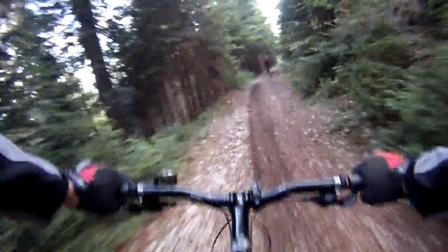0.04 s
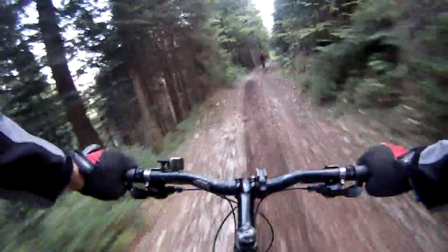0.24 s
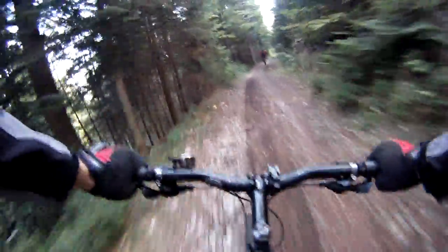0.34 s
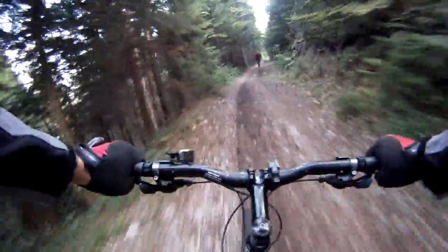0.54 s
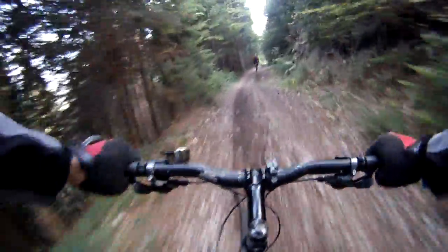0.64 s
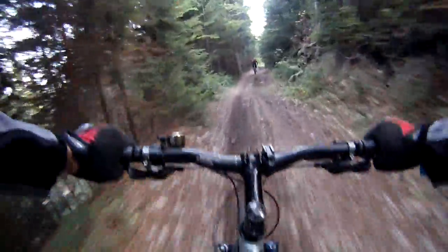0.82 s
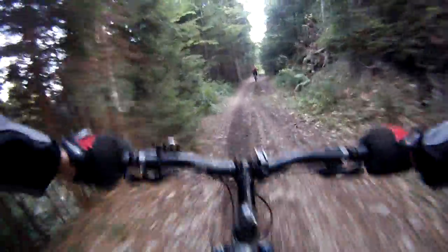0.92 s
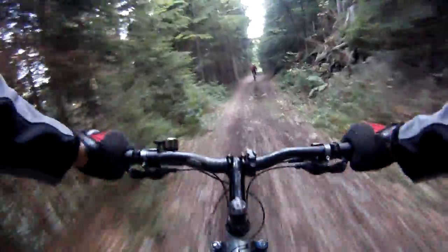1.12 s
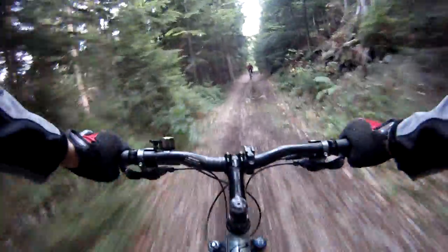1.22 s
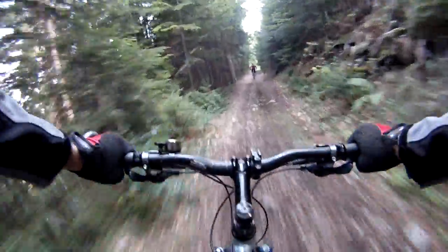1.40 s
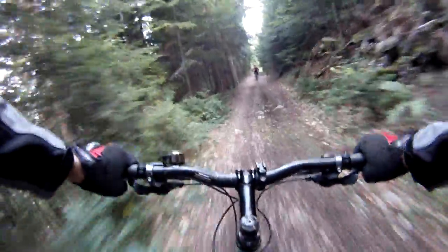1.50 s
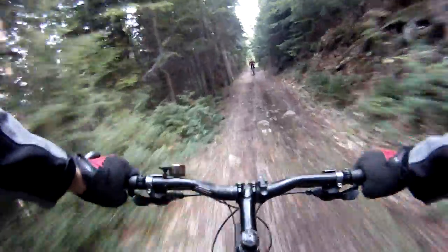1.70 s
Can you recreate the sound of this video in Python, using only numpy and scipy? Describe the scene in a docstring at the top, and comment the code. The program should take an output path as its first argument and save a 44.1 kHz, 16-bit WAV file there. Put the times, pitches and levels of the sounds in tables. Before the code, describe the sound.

A mountain bike rattles over a dirt trail, heard close from the rider. The sharpest clack comes at 0.2 seconds, with more at 1.1 and 1.5. Duller knocks fall between them, the strongest just after 1 second. Dirt patters lightly around then, and a small stone ticks off the bike at 1.3. Quieter, hollow tyre crunch and low wind rumble continue throughout, to about 1.75 seconds.

```python
"""Loose parts clack sharply on a mountain bike as it rolls fast over the bumps of a dirt forest trail.
Each hit makes the parts ring with a few short tones; blows through the frame knock more dully.
The tyres crunch through grit, dirt patters on the bike and one small stone ticks off the frame.
We listen from inside a plastic case on the rider, which makes the crunch sound hollow,
while wind and the shaking of the trail rumble underneath."""
import sys
import numpy as np
from scipy import signal
from scipy.fft import rfft, irfft
from scipy.io import wavfile
from scipy.ndimage import uniform_filter1d

SR = 44100
rng = np.random.default_rng(int(sys.argv[2]) if len(sys.argv) > 2 else 0)


def put_to_file(sound):
    """Save the sound as 16-bit audio at rate SR, in the file named by the first command-line argument."""
    columns = np.atleast_2d(sound).T  # one column per channel
    safe = np.clip(columns, -1, 1)
    whole_steps = np.round(safe * 32767)
    wavfile.write(sys.argv[1], SR, whole_steps.astype(np.int16))


N = 77175

WIND_LEVELS = [(0, -44), (.2, -44), (.6, -42.5), (.78, -41), (.85, -48), (1.05, -42.5), (1.35, -43),
               (1.75, -48)]  # how loud the wind is: t/s, level/dB
WIND_SPECTRUM = [(12, 1.5), (30, 0), (55, -5), (100, -6), (140, -12), (190, -12), (270, -22), (600, -74)]  # rumble of wind and trail, low to high: f/Hz, level/dB
BUFFETS = [(.045, 0.0038, 10), (.325, 0.025, 3), (.395, 0.041, 5), (.915, 0.033, 10), (.965, 0.012, 9.5)]  # swells on rough ground: t/s, length/s, boost/dB

SPRAY_LEVELS = [(0, -63), (.8, -75), (.9, -60.5), (1.02, -54.5), (1.13, -55), (1.22, -66.5), (1.75, -65.5)]  # how loud the flying dirt is: t/s, level/dB
SPRAY_PEAKS = [(4680, 340, 4.5), (5140, 690, -5.5), (7250, 960, -3.5)]  # pitches the dirt brings out: f/Hz, width/Hz, level/dB
CLOD_HITS = [(0.286, -47), (0.91, -42), (1.017, -43), (1.12, -43), (1.308, -44.5)]  # bigger lumps of dirt landing: t/s, level/dB

TOP_RING_HZ = 13950  # a high tone shared by the case and the clacks
CASE_PEAKS = [(1254, 423, 2.2), (2039, 304, 5.76), (2285, 260, -4.5), (3140, 540, -4), (3665, 312, -1.3),
              (4940, 760, -15.5), (7020, 930, -18), (8420, 470, -9.5), (8970, 740, -12.5),
              (9880, 440, -8.5), (10680, 260, -13), (TOP_RING_HZ, 660, -11.5), (15000, 750, -16.5)]  # pitches the hollow case favours: f/Hz, width/Hz, level/dB
TYRE_LEVELS = [(0, -48.5), (.06, -48), (.2, -46.5), (.33, -48.5), (.44, -44), (.56, -44), (.74, -44.5),
               (.85, -47), (.91, -42.5), (1.0, -44), (1.15, -44), (1.28, -48.5), (1.45, -50), (1.63, -50),
               (1.75, -49)]  # how loud the tyres are: t/s, level/dB
SCUFFS = [(.002, 0.0089, 16), (.288, 0.0041, 6), (0.326, 0.011, 7), (0.362, 0.0045, 8.5), (.799, 0.012, 7),
          (0.914, 0.0048, 7), (1.215, 0.0031, 5), (1.528, 0.0039, 7), (1.584, 0.0064, 7), (1.735, 0.009, 8)]  # the tread slips on loose grit: t/s, length/s, boost/dB
HISS_SPECTRUM = [(200, 0), (350, 0), (700, 3), (1000, -10.5), (1700, -33), (2600, 3), (4200, -12),
                 (6000, -29.5), (8000, -16), (12000, -28.5), (15000, -29)]  # hiss of the tread: f/Hz, level/dB
DRONE_PEAKS = [(180, 21, -2.5), (343.4, 118, -3.5), (537, 19, -2.5)]  # hum of the tyres in the frame: f/Hz, width/Hz, level/dB

# The tones of a stone on the frame (t60 is the time to fade by 60 dB): f/Hz, level/dB, t60/s
STONE_TONES = [(900, 3.5, 0.023), (1180, -19, 0.023), (5310, 4, .006), (6550, -1.5, 0.011),
               (11040, -9, 0.017), (12900, -8, 0.012)]
CRACK_SPECTRUM = [(150, -7), (500, 7.5), (1000, 19.5), (2000, -18), (3900, 0.5), (4500, -8), (7300, -29),
                  (8600, -0.5), (10400, 3.5), (12000, -14), (14000, -1.5), (16000, -8)]  # dense ringing around each hit: f/Hz, level/dB
KNOCK_HITS = [(0.0222, -21.5, -0.5, -28), (0.1095, -30.5, -21, -31), (0.4040, -27, -16, -42),
              (0.537, -33, -9, -28), (0.5849, -21.5, -12, -2.5), (1.0497, -8.5, 2, -10.5),
              (1.2241, -18, -16, -8.5), (1.5984, -33, 6.5, -5)]  # dull blows: t/s, level/dB, treble/dB, thump/dB
KNOCK_TONES = [(483, -4, 0.0073), (951, -2.5, 0.027), (1054, -13.5, 0.017), (1267, 2.5, 0.021),
               (1540, -14, 0.026), (1964, -6.5, 0.019), (2220, -18, 0.037), (2536, -12.5, 0.025),
               (3010, -19, 0.024), (3620, -2.5, 0.011), (8440, -12.5, 0.015), (9300, -19, 0.01),
               (14500, -17, 0.0081)]  # what a knock rings with: f/Hz, level/dB, t60/s
CHINK_PEAKS = [(10840, 490, -1), (13350, 800, -2.5)]  # thin, high part of a knock: f/Hz, width/Hz, level/dB
CLACK_HITS = [(0.2011, -6, -4.5, 1.2, -34), (1.1102, -13.5, 3, 3.5, -24.5), (1.4776, -15.5, -4.5, -1, -42)]  # sharp blows: t/s, level/dB, main ring/dB, treble/dB, tail/dB
CLACK_TONES = [(661, -23, 0.081), (938, -12.5, 0.025), (1137, 2.66, 0.0068), (1242, -2.2, 0.017),
               (1498, -3, 0.019), (1824, 4.1, 0.016), (1980, 4.2, 0.022), (2240, -4.5, 0.029),
               (2636, -12.5, 0.025), (3095, -0.55, 0.011), (3541, 0, 0.014), (4016, -9, 0.01),
               (8520, 0.93, 0.0079), (10000, 0.21, 0.013), (TOP_RING_HZ, -1, 0.011)]  # what a clack rings with: f/Hz, level/dB, t60/s

SHARP_ATTACK_S = 0.000092  # how fast a hard hit starts
BUILD_FROM_HZ, BUILD_S = 2800, 0.0018  # tones above this pitch have their own rise time


def from_db(db):
    """Turn decibels into a number to multiply by."""
    return 10 ** (np.asarray(db) / 20)


def rms_one(x):
    """Scale a sound so its average strength (rms) is 1."""
    return x / np.sqrt(np.mean(x ** 2) + 1e-20)


def seconds():
    """The time of every sample."""
    return np.arange(N) / SR


def since(start):
    """Seconds since a hit, zero before it."""
    return np.maximum(seconds() - start, 0)


def in_time(rows):
    """Join points in time with straight lines."""
    return np.interp(seconds(), *np.transpose(rows))


def flares(rows):
    """Short rounded rises in level, in dB."""
    return sum(db * np.exp(-((seconds() - at) / length) ** 2) for at, length, db in rows)


def drift(per_s):
    """A smooth random wobble, about 1 in size."""
    size = max(int(SR / per_s), 1)
    smoothed = uniform_filter1d(rng.standard_normal(N), size, mode="wrap")
    return rms_one(uniform_filter1d(smoothed, size, mode="wrap"))


def swell(t, attack, t60):
    """Rise quickly, then fade away; times are in seconds."""
    return (1 - np.exp(-t / attack)) * np.exp(-np.minimum(np.log(1000) * t / t60, 50))


def colour(x, spectrum):
    """Shape the lows and highs of a sound."""
    hz, db = np.transpose(spectrum)
    bin_hz = np.arange(N // 2 + 1) * SR / N
    gain = from_db(np.interp(np.log(bin_hz + 1), np.log(hz), db))
    return rms_one(irfft(rfft(x) * gain, N))


def resonate(x, hz, width_hz):
    """Keep the part of a sound near one pitch, filtering twice for steep sides."""
    r = np.exp(-np.pi * width_hz / SR)
    b = (1 - r * r) / 2 * np.array([1, 0, -1])
    a = [1, -2 * r * np.cos(2 * np.pi * hz / SR), r * r]
    return signal.lfilter(b, a, signal.lfilter(b, a, x))


def wind():
    """Wind and trail rumble low down and swell on rough ground."""
    level = from_db(in_time(WIND_LEVELS) + flares(BUFFETS))
    return level * colour(rng.standard_normal(N), WIND_SPECTRUM)


def grains(per_s, spread_db):
    """Clicks of uneven size at random moments."""
    sizes = from_db(spread_db * np.minimum(rng.exponential(1, N), 4)) * rng.choice([-1, 1], N)
    return rms_one(sizes * (rng.random(N) < per_s / SR))


def grit():
    """Tiny grains are crushed at random, over a smooth rub."""
    return from_db(-4) * grains(per_s=1500, spread_db=2.5) + rng.standard_normal(N)


def grit_through(peaks):
    """Gritty noise that rings around each of the given pitches."""
    return rms_one(sum(from_db(db) * resonate(grit(), hz, width) for hz, width, db in peaks))


def dirt_spray():
    """Specks thrown off the wheel patter on the bike; a few clods tick louder."""
    specks = grains(per_s=1200, spread_db=4.5)
    patter = rms_one(sum(from_db(db) * resonate(specks, hz, width) for hz, width, db in SPRAY_PEAKS))
    clods = sum(from_db(db) * swell(since(start), SHARP_ATTACK_S, t60=0.027) for start, db in CLOD_HITS)
    return from_db(in_time(SPRAY_LEVELS)) * patter + clods * grit_through(SPRAY_PEAKS)


def tyres():
    """Grit under the tread sets the case ringing and flares with each scuff, over a low drone."""
    flutter_db = 2.09 * drift(per_s=270)
    hollow = grit_through(CASE_PEAKS)
    hiss = from_db(-8) * colour(grit(), HISS_SPECTRUM)
    crunch = from_db(flares(SCUFFS) + flutter_db) * (hollow + hiss)
    drone = from_db(-11) * grit_through(DRONE_PEAKS)
    return from_db(in_time(TYRE_LEVELS)) * (crunch + drone)


def ring(t, tones, attack, chatter_db=0):
    """A struck part rings with fading tones, which waver if the contact chatters."""
    out = np.zeros(N)
    for k, (hz, db, t60) in enumerate(tones):
        waver_db = chatter_db * drift(per_s=580) if chatter_db else 0
        fade = swell(t, BUILD_S if hz > BUILD_FROM_HZ else attack, t60)
        direction = (-1) ** k  # neighbouring tones swing opposite ways
        out += direction * from_db(db + waver_db) * np.sin(2 * np.pi * hz * t) * fade
    return out


def stone():
    """A small stone ticks once off the frame."""
    return from_db(-31) * ring(since(1.2868), STONE_TONES, attack=0.00017)


def harden(tones, treble_db):
    """A harder hit makes the high tones louder; a softer one makes them quieter."""
    ramp_hz = [1550, 3350]  # from no change to the full change
    return [(hz, db + treble_db * np.interp(hz, ramp_hz, [0, 1]), t60) for hz, db, t60 in tones]


def crack(t, attack, t60):
    """A burst of noise stands for many small tones dying away together."""
    return colour(rng.standard_normal(N), CRACK_SPECTRUM) * swell(t, attack, t60)


def thump(t, attack):
    """The mount of the case shudders with one low tone after a hit."""
    hz, t60 = 188, 0.039
    return np.sin(2 * np.pi * hz * t) * swell(t, attack, t60)


def knocks():
    """Dull blows pass through the frame, each with a brief buzz and a thin chink."""
    chatter_attack_s = 0.0034
    chink = from_db(-16) * grit_through(CHINK_PEAKS)
    out = np.zeros(N)
    for start, level_db, treble_db, thump_db in KNOCK_HITS:
        t = since(start)
        blow = ring(t, harden(KNOCK_TONES, treble_db), attack=0.0027, chatter_db=3.5)
        blow += from_db(thump_db) * thump(t, chatter_attack_s)
        blow += from_db(-10.5) * crack(t, chatter_attack_s, t60=0.025)
        blow += chink * swell(t, BUILD_S, t60=0.021)
        out += from_db(level_db) * blow
    return out


def clacks():
    """Hard parts slap together, ring brightly and bounce once, leaving a faint tail in the case."""
    main_hz, main_width_hz = 1983, 57  # the main ring, set louder or softer for each hit
    crack_t60_s, bounce_delay_s = 0.0089, 0.0062
    out = np.zeros(N)
    for start, level_db, main_db, treble_db, tail_db in CLACK_HITS:
        t = since(start)
        tones = [(hz, db + main_db * np.exp(-((hz - main_hz) / main_width_hz) ** 2), t60)
                 for hz, db, t60 in harden(CLACK_TONES, treble_db)]
        blow = ring(t, tones, SHARP_ATTACK_S)
        blow += from_db(-25) * thump(t, SHARP_ATTACK_S)
        blow += from_db(-10) * crack(t, SHARP_ATTACK_S, crack_t60_s)
        bounce = swell(since(start + bounce_delay_s), SHARP_ATTACK_S, crack_t60_s)
        blow += from_db(-19.5) * grit_through(CASE_PEAKS) * bounce
        tail = grit_through(CASE_PEAKS) * swell(t, SHARP_ATTACK_S, t60=0.058)
        out += from_db(level_db) * blow + from_db(tail_db) * tail
    return out


def scene():
    """Add all the sounds into one channel."""
    return (clacks() + knocks() + stone() + tyres() + dirt_spray() + wind())[None]


def record(dry):
    """Round off the loudest peaks and cut the very highest treble."""
    ceiling, cutoff_hz = 0.92, 15400
    rounded = dry / (1 + (dry / ceiling) ** 6) ** (1 / 6)
    return signal.sosfilt(signal.ellip(10, .2, 70, cutoff_hz, fs=SR, output="sos"), rounded)


dry = scene()
out = record(dry)
put_to_file(out)
```